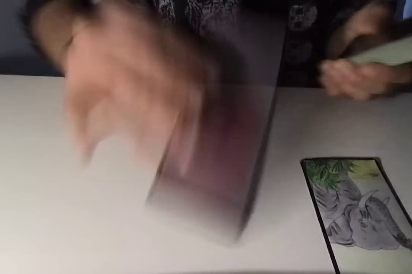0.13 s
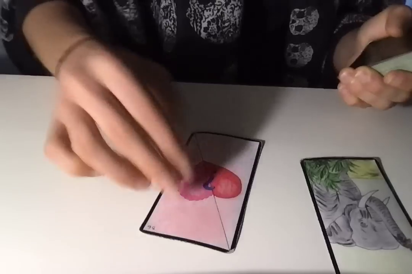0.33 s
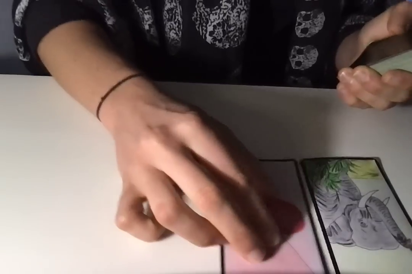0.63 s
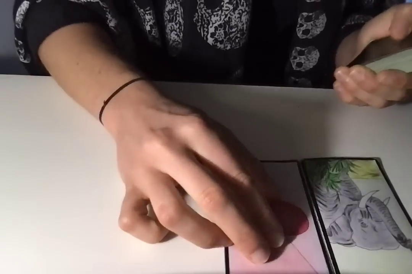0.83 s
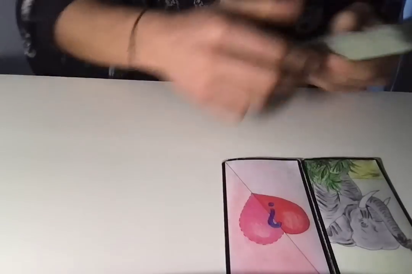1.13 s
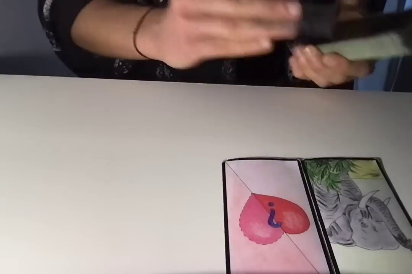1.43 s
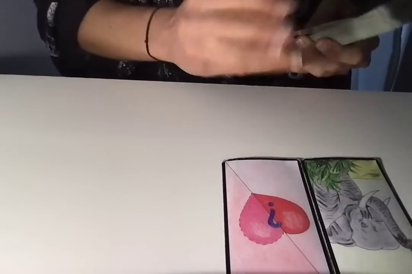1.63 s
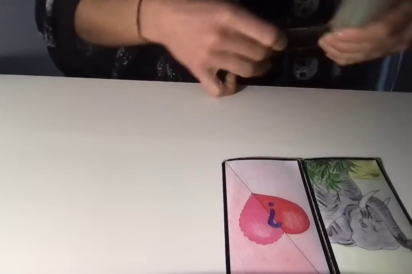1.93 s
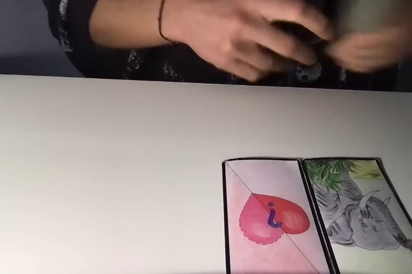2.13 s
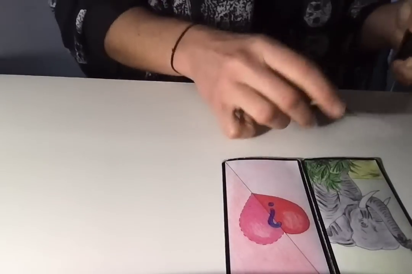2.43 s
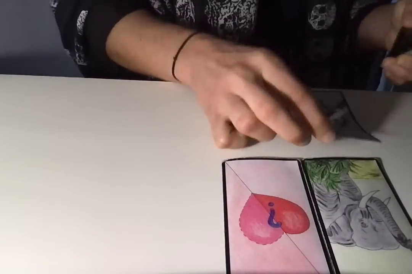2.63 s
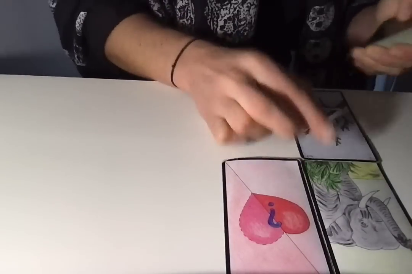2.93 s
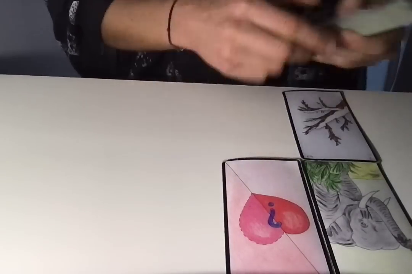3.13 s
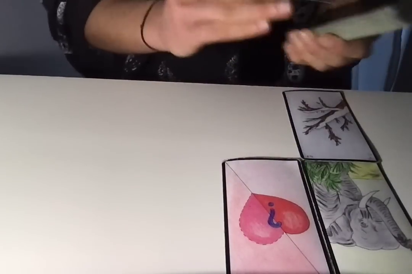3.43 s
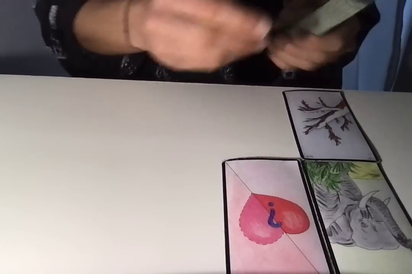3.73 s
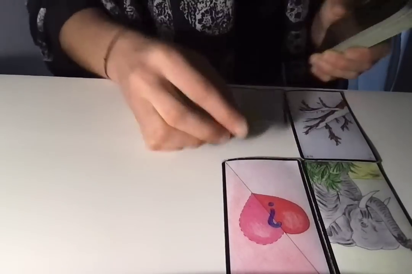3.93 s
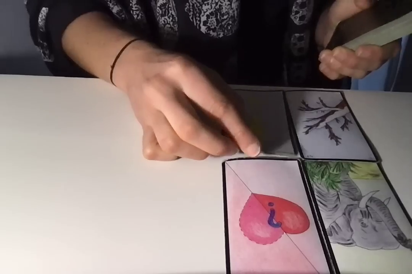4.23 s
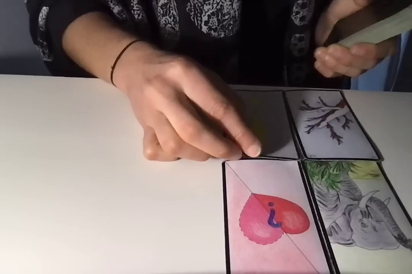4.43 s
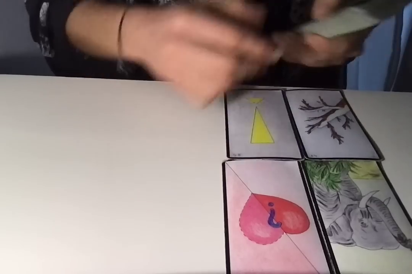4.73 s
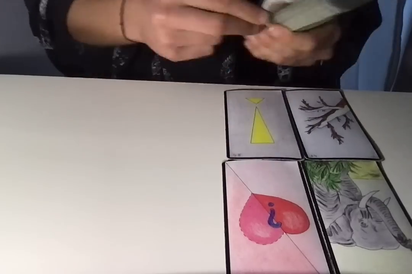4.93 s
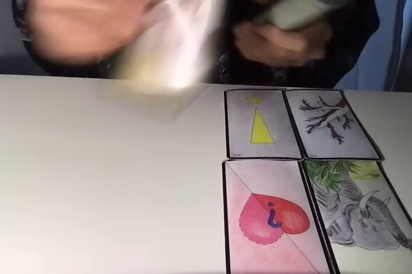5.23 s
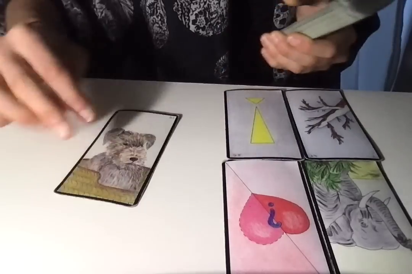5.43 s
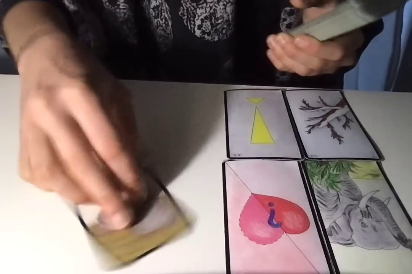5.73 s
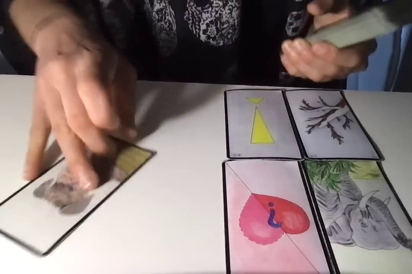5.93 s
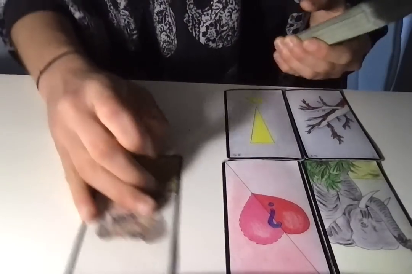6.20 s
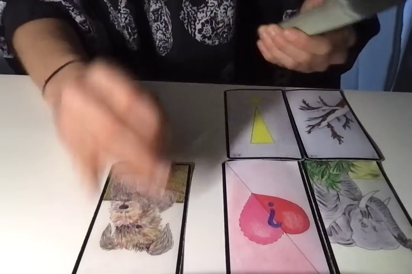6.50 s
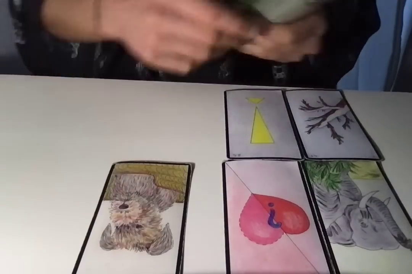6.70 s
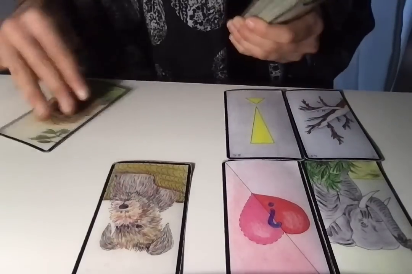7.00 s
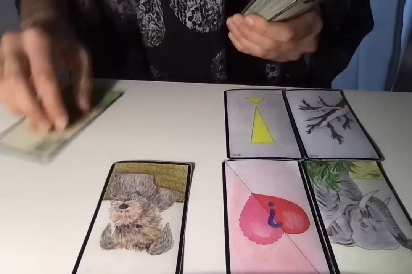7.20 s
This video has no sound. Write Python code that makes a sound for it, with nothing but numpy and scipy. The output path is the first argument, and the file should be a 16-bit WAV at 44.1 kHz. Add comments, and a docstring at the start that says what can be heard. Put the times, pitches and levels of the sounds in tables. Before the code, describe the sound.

In a small quiet room with a steady low rumble, large stiff cards are drawn from a deck, flicked and placed on a table. Sharp snaps with hollow knocks alternate with dry scrapes, fizzy slides and tiny paper clicks. Short deep thuds come through the table into the microphone standing on it. A calmer middle gives way to a hard crack, a longer slide and a final burst of snaps.

```python
"""A small quiet room with a low rumble: large stiff cards are pulled off a deck held in one hand,
flicked, slapped on a table and slid into place. Rubs are shaped noise in three bodies, a dull scrape,
a bright fizz and a hollow murmur; edge contacts are noise bursts that snap and crack, with a hollow knock.
The table top thuds in short low swells into a microphone standing on it, drags rasp in gliding bands,
and random decaying taps answer for the room."""
import sys
import numpy as np
from scipy import signal
from scipy.io import wavfile
from scipy.ndimage import uniform_filter1d

SR = 44100
rng = np.random.default_rng(int(sys.argv[2]) if len(sys.argv) > 2 else 0)


def amplitude_ratio(level_db):
    """Convert a level in decibels to the matching linear amplitude (field) ratio."""
    exponent = np.asarray(level_db, float) / 20
    return 10 ** exponent


def wav_record(signal):
    """Record a signal, one row per channel, as 16-bit PCM in the file named by sys.argv[1]."""
    frames = np.transpose(np.atleast_2d(signal))
    bounded = np.clip(frames, -1, 1)
    # unit amplitude maps onto the largest positive 16-bit level
    quanta = np.round(bounded * 32767).astype(np.int16)
    wavfile.write(sys.argv[1], SR, quanta)


N = 324576


def evened(x):
    """Scales to rms 1."""
    return x / np.sqrt(np.mean(x ** 2) + 1e-20)


def peaked(x):
    """Scales to peak 1."""
    return x / (abs(x).max() + 1e-20)


def read(points, hz):
    """Reads a table on a log-frequency axis."""
    f, value = np.transpose(points)
    return np.interp(np.log(hz + 1), np.log(f + 1), value)


def add(mix, s, sound):
    """Lays a sound into the mix at a time in seconds, trimming what falls outside."""
    at = round(s * SR)
    part = mix[max(at, 0):][:len(sound) + min(at, 0)]
    part += sound[max(-at, 0):][:len(part)]


def causal(points, size=512):
    """Minimum-phase impulse response of a spectrum: nothing sounds before its start."""
    half = np.log(amplitude_ratio(read(points, np.fft.rfftfreq(size, 1 / SR))))
    full = np.concatenate([half, half[-2:0:-1]])
    return np.fft.ifft(np.exp(np.conj(signal.hilbert(full)))).real[:size // 2]


def ring(modes, t, hz):
    """Dying sines on multiples of a pitch, as a struck body or air space rings."""
    return sum(amplitude_ratio(db - 60 * t / t60) * np.sin(2 * np.pi * k * hz * t) for k, db, t60 in modes)


def hiss(points, patchy_db, size, moving_db=lambda hz, t: 0):
    """Noise from random short-time spectra, with drifting patches and a colour that may move."""
    hop = size // 4
    hz = np.fft.rfftfreq(size, 1 / SR)
    a, b, patches = rng.standard_normal((N // hop + 5, len(hz), 3)).T
    patches = uniform_filter1d(patches, size // 40, 0)
    patches = evened(uniform_filter1d(patches, 4096 // size, 1))
    t = np.arange(a.shape[1]) * hop / SR
    colour = amplitude_ratio(read(points, hz)[:, None] + moving_db(hz[:, None] + 1, t))
    colour = colour / np.sqrt(np.mean(colour ** 2, 0))  # the colour moves, the level stays
    z = (a + 1j * b) * colour * amplitude_ratio(patchy_db * patches)
    return evened(signal.istft(z, nperseg=size, noverlap=size - hop)[1][:N])


# The rumbling air of the room. Each row: frequency in Hz, relative level in dB per Hz.
AIR = [(12, -22.5), (20, 0), (71, -2), (114, -23.5), (179, -15.5), (244, -28), (297, -34), (616, -35.5),
       (863, -31), (1140, -45.5), (1690, -57), (2370, -51.5), (4410, -48.5), (14700, -54), (16500, -71.5)]
AIR_DB = -53.5  # rms


def room_tone():
    """Steady low rumble, noise in the colour of the room's air."""
    return amplitude_ratio(AIR_DB) * hiss(AIR, 2.2, size=2048)


# Short rubs of card on card and card settling. Each row: start, peak and end in seconds,
# then the level at the peak of scrape, fizz and murmur in dB.
STROKES = [(-.1, 0.051, 0.055, -50, -48, -54), (.178, 0.191, .26, -36, -40, -56),
           (.98, .995, 1.04, -68, -70, -72.5), (1.0, 1.054, 1.11, -60, -64, -72),
           (1.167, 1.257, 1.4, -49, -57.5, -49), (1.35, 1.377, 1.44, -44, -61, -41.5),
           (1.46, 1.529, 1.62, -57, -62, -53), (1.76, 1.782, 1.9, -57.5, -62, -62),
           (1.76, 1.874, 1.905, -57.5, -61.5, -70), (1.92, 1.979, 2.04, -65.5, -78, -66),
           (2.04, 2.124, 2.155, -52, -66.5, -59), (2.15, 2.2, 2.24, -68, -73, -68),
           (2.253, 2.284, 2.31, -41.5, -55.5, -57), (2.29, 2.364, 2.55, -59.5, -63, -69),
           (2.36, 2.47, 2.485, -57.5, -79.5, -68), (2.472, 2.546, 2.64, -60.5, -66, -73),
           (2.568, 2.646, 2.7, -65.5, -71.5, -76), (2.884, 2.892, 2.92, -42, -67, -54),
           (2.885, 2.92, 3.02, -60, -71.5, -68), (3.128, 3.143, 3.25, -53.5, -59, -52),
           (3.193, 3.254, 3.37, -47.5, -57.5, -54.5), (3.36, 3.373, 3.472, -44.5, -65.5, -48.5),
           (3.482, 3.521, 3.596, -60.5, -62, -51), (3.569, 3.608, 3.64, -70, -69.5, -72),
           (3.697, 3.71, 3.77, -62, -68, -62), (3.74, 3.791, 3.83, -48.5, -55.5, -51.5),
           (3.84, 3.865, 3.92, -75, -72.5, -52), (3.88, 3.933, 4.023, -66.5, -59.5, -65),
           (4.24, 4.258, 4.28, -68, -70, -80.5), (4.491, 4.504, 4.56, -54.5, -66.5, -62),
           (5.118, 5.151, 5.22, -51, -54, -62), (5.156, 5.2, 5.25, -60.5, -64, -45),
           (5.221, 5.257, 5.29, -81.5, -57, -58), (5.296, 5.332, 5.348, -81, -73.5, -46),
           (5.34, 5.349, 5.45, -45.5, -66, -68), (6.53, 6.566, 6.583, -56.5, -64.5, -80.5),
           (6.653, 6.679, 6.72, -61.5, -65, -73), (6.72, 6.835, 6.9, -51, -56.5, -53.5),
           (6.8, 6.874, 6.9, -54, -50.5, -58), (6.901, 6.953, 6.975, -55.5, -52.5, -68),
           (6.99, 7.011, 7.03, -33, -37.5, -30.5), (7.009, 7.027, 7.13, -45, -52.5, -62)]
STROKE_FADE_DB = 24  # how far the start and the end lie under the peak
STROKE_ROUND = 1.28  # 1 = pointed, 2 = round top
# Tilt of a stroke's fizz, in one row: dB per octave, more dB per octave for each dB of fizz over scrape.
STROKE_TILT = (-1.1, .3)
# A card pushed along the table top, one list a slide. Each row: time in seconds,
# level of scrape, fizz and murmur in dB, tilt of the fizz in dB per octave.
SLIDES = [
    [(.397, -75, -89, -72, 0), (.405, -58, -66.5, -56.5, -2), (.451, -58.5, -50.5, -59.5, -1.7),
     (.549, -56, -52.5, -66, -2), (.64, -62.5, -64, -71.5, -2), (.715, -83.5, -89.5, -75, -0.5)],
    [(5.563, -84, -94, -79, -3.5), (5.579, -53.5, -69, -51, -4), (5.603, -59.5, -51.5, -63, -1.2),
     (5.781, -64, -52, -69.5, 8.5), (5.8, -70.5, -60, -64.5, 1), (5.867, -64, -43, -69, 10),
     (5.905, -58.5, -48.5, -64, 2), (5.918, -57.5, -65, -63, 8.5), (5.952, -60, -63, -63, 4),
     (5.982, -75, -74, -59.5, -1), (6.032, -59, -51.5, -77, 1), (6.041, -50.5, -50.5, -48, -2),
     (6.236, -64, -55.5, -80, -2.5), (6.342, -77.5, -84, -76, -2)],
    [(7.173, -70, -86, -73, -6), (7.18, -48.5, -50.5, -56, -5.5), (7.242, -65, -49, -69, 2.5),
     (7.359, -68, -47, -68, 8)],
]
# The hands are never quite still. One row: level of scrape, fizz and murmur in dB.
RESTLESS_DB = (-81.5, -84.5, -74.5)
# Pitch of the hollow under a rub. One row: in the cupped deck in Hz, flat on the table in Hz.
MURMUR_HZ = (640, 1027)


def friction():
    """Strokes and slides add in power to levels of three bodies, fizz tilt and pitch of the hollow."""
    t = np.arange(0, N / SR, .001)
    rows = []
    for start, peak, end, scrape_db, fizz_db, murmur_db in STROKES:
        away = np.maximum((peak - t) / (peak - start), (t - peak) / (end - peak)) ** STROKE_ROUND
        levels = [db - STROKE_FADE_DB * away for db in (scrape_db, fizz_db, murmur_db)]
        tilt = STROKE_TILT[0] + STROKE_TILT[1] * (fizz_db - scrape_db)
        rows.append(levels + [tilt + 0 * t])
    for slide in SLIDES:
        s, *columns = np.transpose(slide)
        rows.append([np.interp(t, s, c, -200, -200) for c in columns])  # silent outside the slide
    rows = np.array(rows)
    power = amplitude_ratio(2 * rows[:, :3])
    total = power.sum(0) + amplitude_ratio(2 * np.array(RESTLESS_DB))[:, None]
    tilt = (power[:, 1] * rows[:, 3]).sum(0) / total[1]  # the louder rub decides
    on_table = power[len(STROKES):, 2].sum(0) / total[2]
    hollow_hz = MURMUR_HZ[0] + (MURMUR_HZ[1] - MURMUR_HZ[0]) * on_table
    return t, 10 * np.log10(total), tilt, hollow_hz


# Dull body of a rub. Each row: frequency in Hz, relative level in dB per Hz.
SCRAPE = [(900, -26), (1300, -31.5), (1800, 0), (2300, -1.5), (3030, -2), (3600, -4), (4600, -5),
          (6500, -19.5)]
# Bright body of a rub, before its tilt. Each row: frequency in Hz, relative level in dB per Hz.
FIZZ = [(2500, -18.5), (3600, -3), (4600, -2.5), (6890, 2.5), (10200, -3), (11700, -1.5), (13800, -7.5),
        (15500, -8.5), (16200, -29), (16800, -50.5)]
# Hollow body of a rub, before its hump. Each row: frequency in Hz, relative level in dB per Hz.
MURMUR = [(100, -29.5), (200, 13), (400, -5), (1500, -8), (2200, -14.5)]
MURMUR_OCTAVES = 0.97  # the hollow's hump is 6 dB down this far from its pitch


def rubbing(grit_db=2.8, fine_grit_db=1.3):
    """Friction noise in three bodies; uneven grip makes them flutter, the fizz least."""
    s, levels_db, tilt, hollow_hz = friction()
    level = amplitude_ratio([np.interp(np.arange(N) / SR, s, db) for db in levels_db])
    grip = evened(uniform_filter1d(rng.standard_normal(N), size=200))
    flutter = evened(amplitude_ratio(grit_db * grip))
    fine_flutter = evened(amplitude_ratio(fine_grit_db * grip))

    def fizz_tilt(hz, t):
        """Tilts the fizz around 8 kHz."""
        return np.interp(t, s, tilt) * np.log2(hz / 8e3)

    def hollow_hump(hz, t):
        """Lifts the murmur around the pitch of the hollow."""
        octaves = np.log2(hz / np.interp(t, s, hollow_hz))
        return np.maximum(-6 * (octaves / MURMUR_OCTAVES) ** 2, -30)

    scrape = hiss(SCRAPE, 2.0, size=256) * flutter
    fizz = hiss(FIZZ, 1.9, size=256, moving_db=fizz_tilt) * fine_flutter
    murmur = hiss(MURMUR, 3.0, size=512, moving_db=hollow_hump) * flutter
    return (level * [scrape, fizz, murmur]).sum(0)


# How fast the room dies. Each row: frequency in Hz, t60 in seconds.
ROOM = [(150, 0.28), (500, 0.14), (1500, 0.28), (3000, 0.27), (6000, 0.24), (12000, 0.3)]
# How strongly the room answers. Each row: frequency in Hz, level of the tail in dB.
ROOM_COLOUR = [(200, -5.5), (1000, -9.5), (3000, -10.5), (6000, -10), (12000, -14.5)]
FIRST_WALL_S = 0.0077  # the tail is thin until the first wall answers


def room(x):
    """Sparse taps of random sign, each band dying at its own speed."""
    size = SR // 2
    taps = np.zeros(size)
    at = np.arange(200, size - 20, 20)
    taps[at + rng.integers(0, 20, len(at))] = rng.choice([-1., 1.], len(at))
    taps = taps * np.clip(np.arange(size) / SR / FIRST_WALL_S, 0, 1) ** 3
    hz, t, z = signal.stft(taps, SR, nperseg=256)
    z = z * amplitude_ratio(-60 * t / read(ROOM, hz)[:, None])
    tail = signal.istft(z, SR, nperseg=256)[1]
    coloured = signal.istft(z * amplitude_ratio(read(ROOM_COLOUR, hz))[:, None], SR, nperseg=256)[1]
    return signal.fftconvolve(x, coloured / np.linalg.norm(tail))[:N]


# Tiny paper clicks ride on the scrape. One row: snap, knock and crack in dB over the scrape,
# before the random spread.
RUSTLE_DB = (1, -5.5, -3)
RUSTLE_SPREAD_DB = 3  # per factor e of a random size


def rustle(count=220):
    """Rows of tiny contacts at random moments, their strength following the scrape at that moment."""
    t, levels_db, *_ = friction()
    when, size, pitch = rng.random((count, 3)).T
    s = when * N / SR
    db = np.interp(s, t, levels_db[0]) - RUSTLE_SPREAD_DB * np.log(size + 0.023)
    snap_db, knock_db, crack_db = np.add.outer(RUSTLE_DB, db)
    return list(zip(s, snap_db, knock_db, 350 * 3 ** pitch, crack_db))


# Contacts of a card edge. Each row: time in seconds, snap of the card in dB (peak),
# knock of the hollow in dB (peak), pitch of the hollow in Hz, crack of the edge in dB (peak).
TICKS = [(.0296, -16.5, -16, 674, -32), (.0429, -30, -42, 388, -46), (.047, -45, -57, 720, -38),
         (.1506, -39, -44, 830, -37), (.1799, -21, -22.5, 660, -17), (.1838, -17, -48, 296, -20),
         (.1889, -13, -21.5, 407, -21.5), (.1961, -26, -20, 867, -46), (.2008, -20.5, -37, 745, -46),
         (.4022, -55, -50, 432, -64), (1.1823, -50, -49, 309, -66), (1.2163, -27.5, -22, 707, -37.5),
         (1.3317, -14, -16.5, 529, -24), (1.3679, -25, -24.5, 1112, -23), (1.3765, -20, -29, 1216, -47),
         (1.4978, -43, -27.5, 580, -66), (1.5098, -45, -36, 600, -51), (1.523, -40, -41, 662, -54),
         (1.532, -32, -38, 280, -40), (1.5412, -34.5, -22.5, 524, -43), (1.6134, -45, -47, 682, -56),
         (1.7336, -43, -35.5, 345.5, -49), (1.9362, -40.5, -42.5, 1081, -62),
         (1.9776, -51, -43.5, 565, -66), (2.0217, -38.5, -40, 678, -52), (2.0496, -26.5, -27, 610, -39.5),
         (2.069, -61, -40.5, 726, -67), (2.118, -46, -37, 524, -50), (2.1894, -48, -41.5, 613, -62),
         (2.2034, -44, -65, 658, -65), (2.2516, -23.5, -34, 677, -40), (2.2601, -30, -24.5, 620, -35),
         (2.3, -46, -44, 590, -46), (2.3562, -43, -53, 652, -59), (2.38, -39, -46, 466, -57),
         (2.4715, -44, -43.5, 332, -61), (2.8762, -42, -47, 502, -56), (2.8901, -34, -40, 640, -31.5),
         (2.8992, -46, -38.5, 406, -64), (2.934, -46, -62, 722, -43), (3.1002, -52, -57, 1102, -59),
         (3.1436, -36, -44, 324, -52), (3.182, -48, -42.5, 601, -58), (3.237, -53, -36.5, 710, -53),
         (3.3102, -37, -45, 326, -47), (3.3161, -30.5, -23, 528, -34), (3.363, -23, -26, 691, -24),
         (3.3751, -21.5, -32.5, 347, -54), (3.4706, -38, -34.5, 417, -51), (3.4768, -48, -27.5, 466, -64),
         (3.5063, -40, -35, 617, -63), (3.5122, -32, -29.5, 651, -39.5), (3.529, -45, -28, 671, -48),
         (3.6052, -43, -51, 1110, -69), (3.7035, -34.5, -34, 1092, -59), (3.707, -47, -30, 315.5, -50.5),
         (3.7995, -39, -39, 619, -38), (3.815, -35, -35, 665, -56), (3.8578, -20, -23, 617, -22),
         (3.8736, -28.5, -38, 713, -35), (3.974, -43, -49, 400, -53), (4.26, -47.5, -49, 518, -58),
         (4.4999, -38.5, -38, 366, -35.5), (4.5716, -52, -65, 1078, -55), (4.8271, -51.5, -50, 667, -82),
         (4.8828, -42, -48, 730, -56.5), (5.028, -51, -43.5, 522, -66), (5.0983, -41.5, -36.5, 710, -54),
         (5.13, -49, -44, 660, -66), (5.186, -36, -33, 690, -51), (5.2058, -24.5, -26, 453.5, -42),
         (5.2621, -36.5, -28.5, 380, -35), (5.3057, -54, -43, 962, -52), (5.3273, -40, -36, 372, -67),
         (5.3411, -13, -15, 1095, -7), (5.3524, -36, -28.5, 456, -46), (5.366, -57, -33, 983, -47.5),
         (5.3766, -24.5, -41, 370, -26), (5.3861, -25, -31.5, 611, -53), (5.425, -42, -35, 664, -68),
         (5.5738, -41.5, -42.5, 966, -35), (5.5948, -49, -38.5, 296, -49), (6.042, -36, -46, 752, -41),
         (6.5593, -53, -75, 548, -66), (6.675, -47, -45, 1046, -55), (6.7705, -27, -23.5, 716, -35.5),
         (6.833, -39, -43, 686, -49), (6.8674, -34, -37, 750, -39), (6.8816, -26, -34.5, 721, -40),
         (6.8873, -51, -30.5, 424, -49), (6.9891, -18, -25.5, 608, -17), (7.004, -16.5, -21.5, 700, -21),
         (7.01, -20, -29.5, 1050, -28), (7.0147, -14.5, -41, 1123, -12), (7.174, -37, -47, 305, -61),
         (7.192, -62, -37.5, 378, -43)]
# Air between hand, deck and table. Each row: multiple of its pitch, relative level in dB, t60 in seconds.
HOLLOW = [(1, 10, 0.027), (1.65, -5.5, 0.054), (.62, -17.5, 0.012)]
# Body of the card. Each row: frequency in Hz, relative level in dB per Hz.
CARD = [(250, -26), (800, -10.5), (1200, -6), (1600, -6.5), (2100, 1.5), (2480, -1), (2900, -2), (3500, -4),
        (4500, -8), (6500, -21.5), (12000, -55.5)]
# The card's strongest bending mode rings on. One row: middle pitch in Hz, level in dB against the
# peak of the card's body, t60 in seconds.
CARD_RING = (2480, -13.5, 0.015)
RING_SPREAD = .1  # each grip bends the card to another pitch (share)
# Bright crack of the edge. Each row: frequency in Hz, relative level in dB per Hz.
EDGE = [(2000, -43), (3500, -16), (4800, 3), (6000, 12), (7500, 10.5), (10000, 4), (13000, 3), (15800, -6),
        (17000, -38.5)]
CONTACT_T60_S = 0.014  # how long an edge chatters


def ticks(first=9.0, hard_db=-17, soft_rise=.001):
    """A sharp pull of air, then a short chatter of the edge, sounds through card, hollow and edge."""
    out, t = np.zeros(N), np.arange(2600) / SR
    card, edge = peaked(causal(CARD)), causal(EDGE)
    card = np.pad(card, (0, len(t) - len(card)))
    ring_hz, ring_db, ring_t60 = CARD_RING
    rows = TICKS + rustle()
    chatter = rng.standard_normal((len(rows), 901))
    for (s, snap_db, knock_db, hz, crack_db), (bend, *noise) in zip(rows, chatter):
        hard = min(amplitude_ratio(.5 * (max(snap_db, crack_db) - hard_db)), 1)  # light touches start soft
        rise = 1 - (1 - hard) * np.exp(-t[:900] / soft_rise)
        contact = np.concatenate([[-first * hard], noise * rise])
        contact = contact * amplitude_ratio(-60 * t[:901] / CONTACT_T60_S)
        # the hollow feels one smooth one-way push, gone in two periods
        push = -amplitude_ratio(-60 * t * hz / 2) * np.pad(rise, (0, len(t) - len(rise)), "edge")
        bent = card + ring([(np.exp(RING_SPREAD * bend), ring_db, ring_t60)], t, ring_hz)
        snap = peaked(signal.fftconvolve(contact, bent))
        knock = peaked(signal.fftconvolve(push, ring(HOLLOW, t, hz)))
        crack = peaked(signal.fftconvolve(contact, edge))
        add(out, s, amplitude_ratio(snap_db) * snap)
        add(out, s, amplitude_ratio(knock_db) * knock)
        add(out, s, amplitude_ratio(crack_db) * crack)
    return out


# Hand and card jolt the table top. Each row: time of the peak in seconds, level in dB before the hum,
# pitch in Hz, swell time in seconds (its fall; the rise takes 0.6 of it).
THUDS = [(0.051, -29, 67, 0.011), (0.194, -36.5, 73.6, 0.021), (0.299, -37.5, 63.3, 0.025),
         (0.45, -35, 54.6, 0.0092), (0.53, -38.0, 60.4, 0.013), (1.227, -32.5, 94.4, 0.0076),
         (1.268, -43, 64.0, 0.012), (1.344, -26, 78, 0.0086), (1.923, -35.0, 82, 0.015),
         (2.172, -44.5, 64.6, 0.015), (2.89, -38.5, 71, 0.013), (3.236, -42.5, 59.4, 0.015),
         (3.32, -24, 78.6, 0.0046), (3.532, -41.5, 60.0, 0.0076), (3.718, -46, 66.6, 0.013),
         (3.825, -45.5, 61, 0.0095), (3.865, -28, 82.5, 0.0063), (3.946, -40.5, 77.4, 0.013),
         (5.215, -37, 73, 0.014), (5.265, -33.5, 84.0, 0.0089), (5.344, -29.5, 79.0, 0.016),
         (5.473, -41.5, 60, 0.025), (5.606, -30.5, 64.6, 0.011), (5.929, -27, 80.7, 0.015),
         (6.002, -39.5, 76, 0.019), (6.059, -44, 57.0, 0.018), (6.889, -28.5, 68.4, 0.0067),
         (6.953, -35, 75.0, 0.0048), (7.005, -37, 91, 0.012), (7.207, -25, 86.7, 0.014),
         (7.263, -42, 60.3, 0.018)]
# Second mode of the table top. One row: multiple of the pitch, level in dB.
OVERTONE = (2.1, -15)
# The top keeps humming after a jolt. One row: nominal pitch in Hz (the hum sounds 1 % lower),
# strength of the feed in dB, t60 in seconds.
TABLE_RING = (62, -20, 0.28)


def thuds():
    """Each jolt is a swell of a few cycles; the top hums on."""
    out, t = np.zeros(N), np.arange(SR) / SR
    near = t[:SR // 5] - 1 / 20  # seconds from the peak
    multiple, overtone_db = OVERTONE
    for s, db, hz, swell in THUDS:
        shape = np.exp(-.5 * (near / swell / np.where(near < 0, .6, 1)) ** 2)
        turn = 2 * np.pi * hz * near
        overtone = amplitude_ratio(overtone_db) * shape * np.sin(multiple * turn)
        add(out, s - 1 / 20, amplitude_ratio(db) * shape * (np.cos(turn) + overtone))
    hum_hz, hum_db, t60 = TABLE_RING
    hum = ring([(0.99, hum_db, t60)], t, hum_hz) * 2 * np.pi * hum_hz / SR
    return out + signal.fftconvolve(out, hum)[:N]


# A fingertip or card corner drags and rasps in one band. Each row: start and end in seconds,
# start and end pitch in Hz, width of the resonance in Hz, level in dB before fades and grit.
DRAGS = [(2.331, 2.489, 2250, 2610, 450, -57), (3.142, 3.203, 1395, 906, 690, -57),
         (4.51, 4.672, 3570, 3270, 1500, -76.5), (4.836, 5.114, 564, 679, 250, -63.5),
         (5.009, 5.076, 2300, 2510, 1180, -70), (5.921, 5.986, 1300, 1106, 903, -62),
         (6.036, 6.13, 1700, 1400, 1800, -50), (6.04, 6.138, 310.4, 281, 119, -55),
         (6.05, 6.135, 170, 160, 49.7, -56.5), (6.709, 6.738, 1620, 1310, 160, -64),
         (6.725, 6.765, 779, 685, 200, -57), (6.79, 6.88, 760, 700, 300, -58)]


def drags(grit_db=2.5):
    """Gritty noise in one gliding resonance."""
    out, grip = np.zeros(N), evened(uniform_filter1d(rng.standard_normal(N), size=130))
    for start, end, hz0, hz1, width, db in DRAGS:
        noise = rng.standard_normal((SR // 2, 2))[:round((end - start) * SR)] @ [1, 1j]
        r = np.exp(-np.pi * width / SR)
        slow = signal.lfilter([1], [1, -2 * r, r ** 2], noise)
        # turning the slow noise lifts it to the gliding pitch
        turn = np.exp(2j * np.pi * np.cumsum(np.linspace(hz0, hz1, len(noise))) / SR)
        rasp = evened((slow * turn).real) * signal.windows.tukey(len(noise), .2)
        add(out, start, amplitude_ratio(db) * rasp)
    return out * evened(amplitude_ratio(grit_db * grip))


def scene():
    """Cards near the microphone, their room, the table and the room tone."""
    cards = ticks() + rubbing() + drags()
    return (cards + room(cards) + thuds() + room_tone())[None]


def roll_off(x):
    """The treble ends steeply here."""
    return signal.sosfilt(signal.butter(12, 16800, fs=SR, output="sos"), x)


MIC_LOW_HZ = 32


def record(dry):
    """The microphone drops the deepest bass."""
    low_cut = signal.butter(3, MIC_LOW_HZ, "high", fs=SR, output="sos")
    return roll_off(signal.sosfilt(low_cut, dry))


dry = scene()
out = record(dry)
wav_record(out)
```